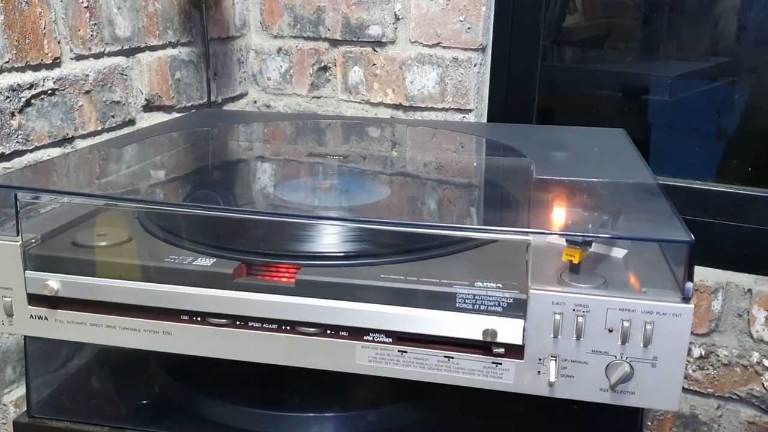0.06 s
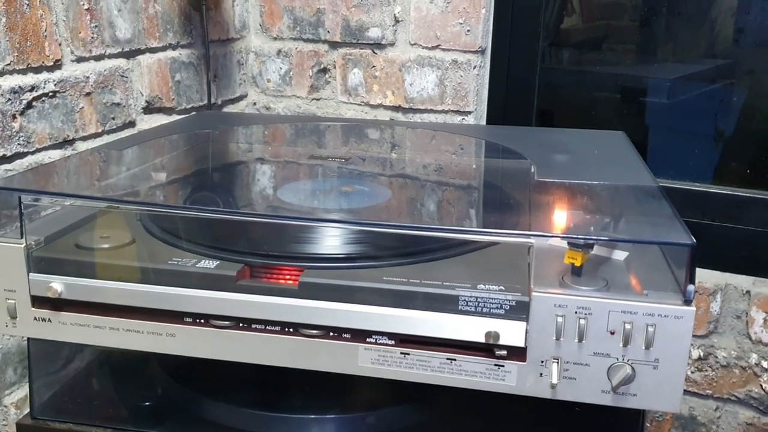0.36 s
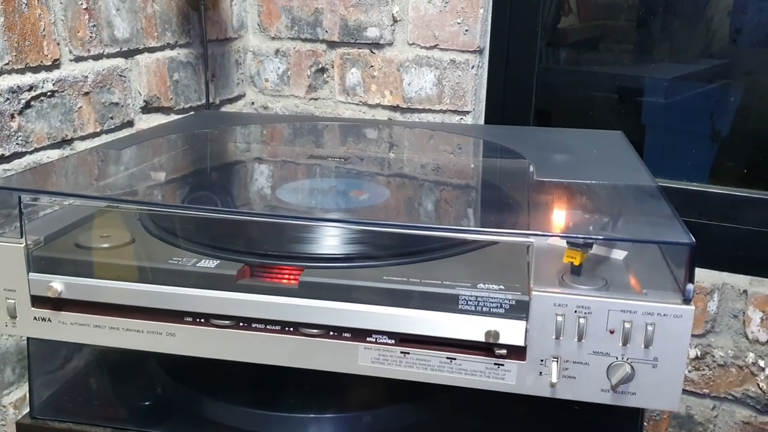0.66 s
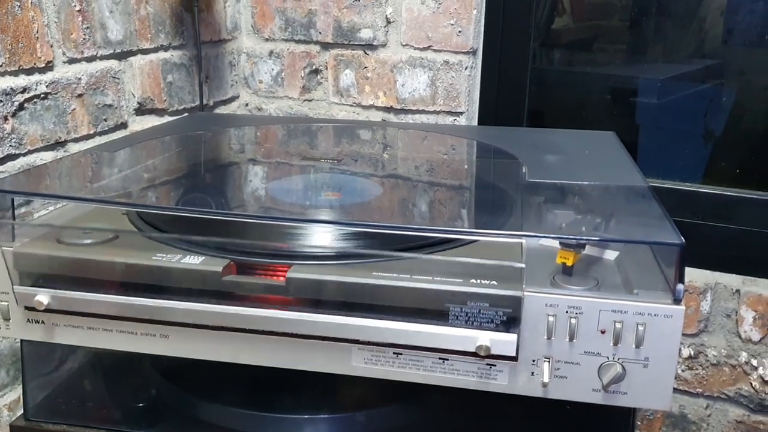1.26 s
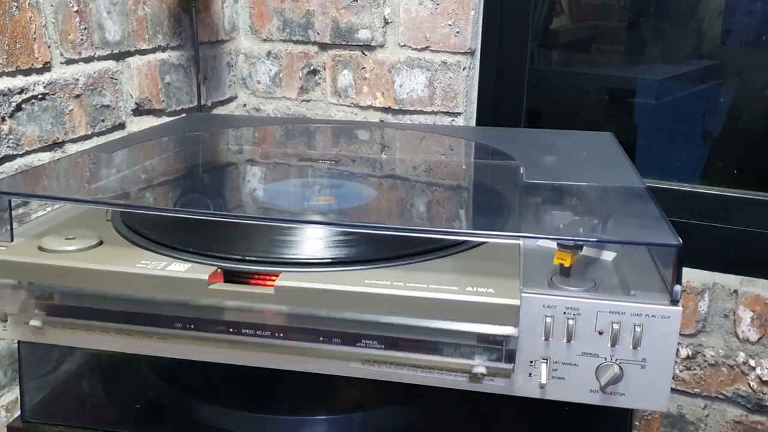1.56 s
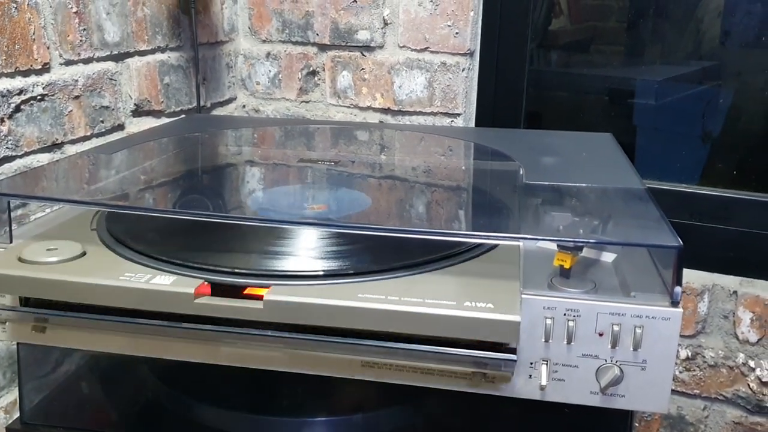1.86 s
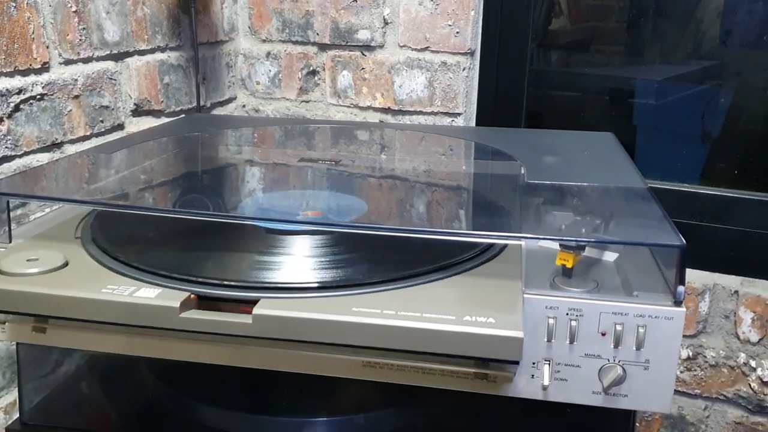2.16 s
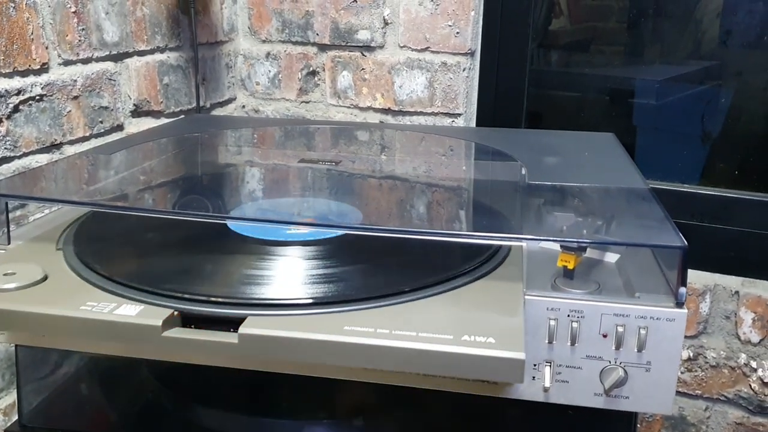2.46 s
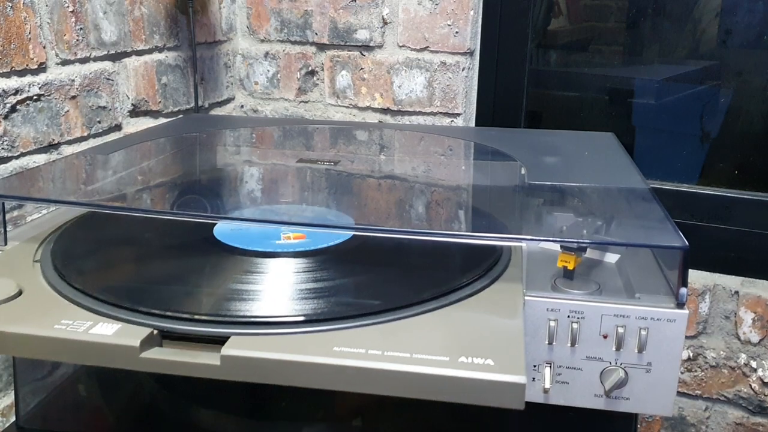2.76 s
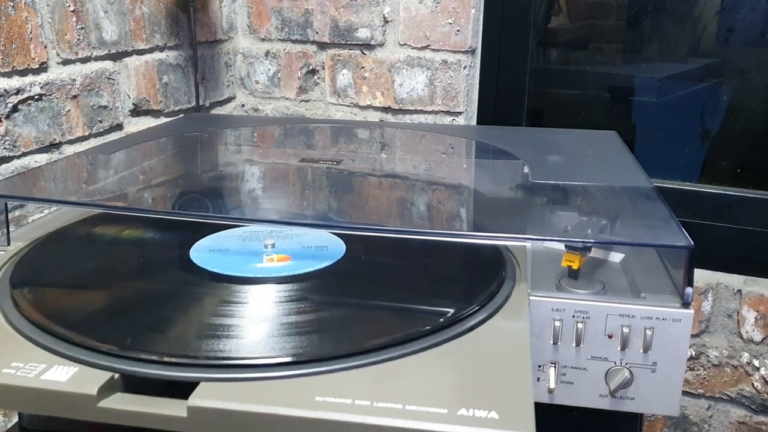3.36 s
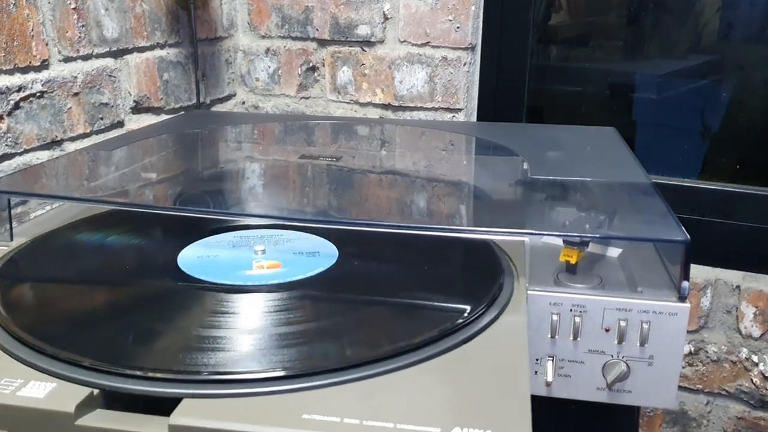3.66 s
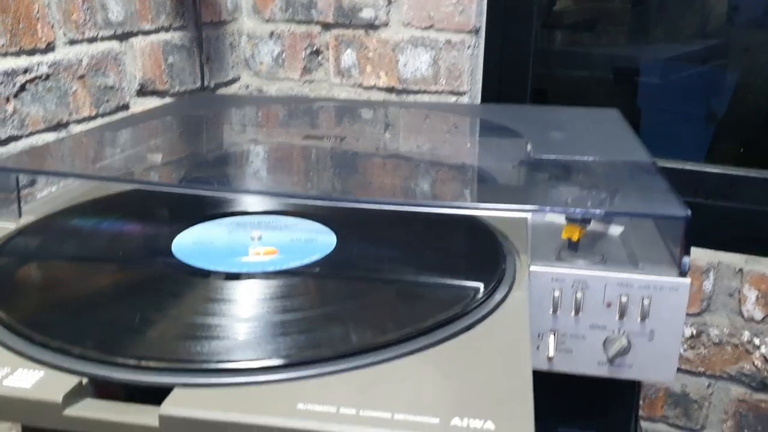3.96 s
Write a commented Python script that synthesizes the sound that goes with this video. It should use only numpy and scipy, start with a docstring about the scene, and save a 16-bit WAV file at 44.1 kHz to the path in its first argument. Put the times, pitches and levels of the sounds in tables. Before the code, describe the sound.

A record player drawer clunks free, then glides open with a small motor's whir.

```python
"""A motor-driven turntable drawer

The latch lets go with a rattling clunk, its impacts exciting the modes of the case. A small geared
motor whirs at multiples of its turn rate while friction makes the runners rub and sing and the heavy
drawer shudder. A close stereo microphone, duller on the right, hears it over faint rumble and hiss."""
import sys
import numpy as np
from scipy import signal
from scipy.fft import rfft, irfft
from scipy.io import wavfile
from scipy.ndimage import uniform_filter1d

SR = 44100
rng = np.random.default_rng(int(sys.argv[2]) if len(sys.argv) > 2 else 0)


def dump_mix(stems):
    """Bounce the given channels to the path in sys.argv[1] as a 16-bit WAV at rate SR."""
    frames = np.atleast_2d(stems).T  # one column per channel
    limited = np.clip(frames, -1, 1)  # hard clip at full scale
    pcm = np.round(limited * 32767).astype(np.int16)
    wavfile.write(sys.argv[1], SR, pcm)


N = 176400

# Speed of the drive gear. Each row: time in seconds, turns per second.
GEAR_SPEED = [(1.0, 38.6), (1.3, 38.2), (1.5, 38.9), (1.7, 40.3), (2.15, 41.0), (2.5, 41.7), (2.75, 42.9),
              (3.1, 43.8), (3.45, 43.0), (3.75, 41.3), (4.0, 41.0)]
# Gear tones. Each entry: a multiple of the turn rate; in the second table, its level in dB.
GEAR_HARMONICS = [7, 8, 10, 15, 23, 27]
GEAR_LEVELS = [-70, -66, -68.5, -76, -73.5, -77.5]
# Hum of a panel at top speed. In order: start and end in seconds, multiple of the turn rate.
PANEL_HUM = (2.66, 3.48, 6)
# Swells of the case as the motor labours. Each row: middle in seconds, level in dB.
CASE_SWELLS = [(1.12, -61), (1.27, -55.5), (2.02, -57.5), (2.76, -53.5), (2.99, -57), (3.15, -55),
               (3.29, -58), (3.45, -54.5), (3.63, -53.5), (3.75, -58)]
# Singing runners. Each row: middle and half length in seconds, pitch and width in Hz, level in dB.
RUNNER_NOTES = [(1.27, .09, 2186, 14, -61.5), (1.29, .06, 2126, 14, -64), (1.19, .15, 2280, 450, -64.5),
                (1.48, .14, 2010, 240, -66), (2.6, .6, 1915, 22, -74), (2.77, .04, 2135, 120, -64.5),
                (3.77, .16, 2250, 700, -68), (3.89, .06, 2020, 150, -63.5)]
# Rubbing of runners and gears. Each row: time in seconds, levels of body, scrape and hiss in dB.
RUB_LEVELS = [(1.07, -49, -57.5, -65), (1.18, -51, -55.5, -64.5), (1.5, -51.5, -58, -64.5),
              (1.62, -48, -56, -63), (1.68, -57, -59.5, -67), (1.75, -50.5, -59, -65),
              (1.97, -57, -60, -64.5), (1.99, -46, -53.5, -63), (2.11, -55.5, -60.5, -69.5),
              (2.19, -54, -59.5, -64), (2.55, -55.5, -61.5, -67), (2.74, -54, -58, -62.5),
              (3.05, -55, -59.5, -65.5), (3.48, -57, -59, -70), (3.62, -50, -56.5, -66.5),
              (3.92, -57, -56.5, -62.5), (3.97, -56, -61.5, -66), (4.0, -58, -54.5, -66.5)]
# Light rubs of the runners. Each row: middle in seconds, level in dB, half length in seconds.
RUNNER_BRUSHES = [(1.21, -70, .05), (1.568, -66, 0.065), (2.89, -63, 0.035)]
# Rocking modes of the drawer. Each row: frequency and width of its wander in Hz, relative level in dB.
DRAWER_MODES = [(58.47, 5, 1), (66.1, 18, -4.5)]

# Envelopes of the sliding and rattling parts. Each row: time in seconds, level in dB.
SHUDDER_LEVELS = [(1.05, -53), (1.08, -33), (1.16, -29.5), (1.27, -33.5), (1.37, -27), (1.435, -34.5),
                  (1.49, -27.5), (1.625, -26), (1.675, -41), (1.72, -27.5), (1.745, -34), (1.795, -23.5),
                  (1.875, -40), (1.93, -28), (1.99, -47), (2.04, -33.5), (2.1, -46.5), (2.17, -34),
                  (2.245, -34), (2.28, -42), (2.365, -49), (2.4, -29), (2.45, -57), (2.52, -31.5),
                  (2.55, -43), (2.6, -27.5), (2.78, -28), (2.89, -37), (3.28, -36.5), (3.35, -75),
                  (3.41, -33.5), (3.47, -48), (3.63, -26), (3.74, -37.5), (3.83, -29), (3.9, -31.5),
                  (3.94, -49), (4.0, -38.5)]  # ahead of the shudder's filter
DRAG_LEVELS = [(3.45, -72), (3.56, -54), (3.65, -52.5), (3.76, -58.5), (3.9, -56), (4.0, -61)]
LATCH_LEVELS = [(.845, -85), (.872, -56), (.886, -48), (.91, -49.5), (.925, -49.5), (.96, -41.5),
                (1.0, -41), (1.025, -40), (1.055, -57), (1.1, -78), (1.2, -101)]
CATCH_LEVELS = [(.89, -78), (.93, -56.5), (.965, -58), (.98, -53), (1.005, -52), (1.03, -61), (1.08, -74.5)]

# Knocks on the case. Each row: start in seconds, ring, clatter and tick in dB, contact time in seconds.
CASE_KNOCKS = [(0.257, -61.5, -52.5, -76, 0.0055), (.292, -59, -51, -77, 0.0096),
               (.326, -62, -59, -78, 0.01), (.882, -49, -47, -80, 0.0013), (.899, -47, -48, -80, 0.0019),
               (.948, -49, -44, -73, 0.0016), (.977, -54, -47, -47, 0.0015),
               (0.999, -46.5, -50, -48, 0.0008), (1.024, -36, -57, -76, 0.0022),
               (1.561, -58, -51, -74, 0.006), (1.991, -55, -50.5, -69, 0.0023)]
# Modes of the struck case. Each row: frequency in Hz, 60 dB decay time in seconds, relative level in dB.
KNOCK_MODES = [(208, 0.11, -9), (301.5, 0.22, -2.5), (420, 0.16, 2), (508, 0.15, -16), (746, 0.11, -13),
               (1198, 0.14, -17), (1405, 0.07, -20), (2194, 0.068, -19)]
# Bright ringing edges of clicks and knocks, and small latch squeaks.
# Each row: start in seconds, level in dB, pitch and width in Hz, 60 dB decay time in seconds.
RINGING_BANDS = [(.275, -68, 3300, 3000, 0.52), (.853, -61, 5900, 1500, 0.12),
                 (0.858, -61, 1380, 900, 0.21), (1.555, -60, 1300, 450, .25), (1.994, -56, 1220, 350, 0.26)]
# Dull bumps of the drawer. Each row: start in seconds, level in dB, frequency in Hz.
DRAWER_BUMPS = [(0.281, -43.5, 66.7), (0.561, -43.5, 64), (0.924, -37.5, 71), (2.177, -34, 92),
                (2.198, -37, 131), (2.2, -46.5, 201), (2.318, -32.5, 94)]

# Spectral shapes of the sources. Each row: frequency in Hz, relative level in dB.
BODY_SPECTRUM = [(40, -9.5), (100, 7.5), (140, 0), (180, 3), (230, -2.5), (300, -1), (360, -4), (400, 1.5),
                 (428, -2), (480, -6.5), (560, 0), (650, -24.5), (900, -20), (3000, -83)]
SCRAPE_SPECTRUM = [(300, -24), (600, -5.5), (740, 3), (850, -6.5), (960, 1.5), (1060, -4), (1190, 4.5),
                   (1300, -4.5), (1700, -4.5), (1950, -0.5), (2250, -5), (2800, -8.5), (6500, -15),
                   (7500, -25), (11000, -18.5), (14000, -25), (16000, -7.5)]
HISS_SPECTRUM = [(1500, -29.5), (3000, 1), (6800, 3), (7400, -2.5), (12000, -5.5), (14200, 2.5),
                 (16000, -20)]
SHUDDER_SPECTRUM = [(15, -26.5), (36, -2.5), (52, -3), (86, 5.5), (110, -4.5), (250, -36.5)]
DRAG_SPECTRUM = [(170, -20), (330, 12), (460, 1), (550, 6), (730, -1), (930, 0.5), (1400, -15),
                 (2200, -11.5), (3200, -14), (6000, -26), (8000, -29), (16000, -27)]
BRUSH_SPECTRUM = [(1200, -16), (2300, 9), (3000, -1), (6500, 4), (7500, -6), (12000, 2), (14300, 9),
                  (16000, -3)]
RATTLE_SPECTRUM = [(30, -17), (70, 13), (130, -7), (300, -1.5), (420, -7), (520, -2.5), (750, -10.5),
                   (900, -9), (1200, -5.5), (1600, -15.5), (2200, -13.5), (2700, -27.5), (6000, -24.5),
                   (7500, -33), (15000, -44)]
CATCH_SPECTRUM = [(1500, -26), (3000, 5.5), (4200, 3), (6000, 1.5), (7500, 0), (10500, 0), (11800, 7.5),
                  (13000, 2), (16000, -3.5)]
TICK_SPECTRUM = [(1500, -43), (3000, -10), (5500, 1), (7500, -10), (10800, -11), (11600, 11), (12200, -4),
                 (12800, -11), (16000, -20)]
BACKGROUND_SPECTRUM = [(20, -40), (40, -2.5), (60, 0.5), (80, -1.5), (120, -13), (250, -21), (400, -28.5),
                       (650, -47.5), (1000, -38.5), (1350, -31), (1800, -41), (2300, -38), (3000, -42),
                       (4000, -36.5), (5000, -36), (6800, -32.5), (7500, -40.5), (12000, -39),
                       (14300, -33.5), (16000, -42)]

# Stereo width. Each row: frequency in Hz, level of side against mid in dB.
STEREO_WIDTH = [(60, -19.5), (130, -13.5), (250, -13), (500, -5.5), (1000, 0), (2000, -1), (4000, 0.5),
                (16000, 1.5)]
# Response of the right microphone port. Each row: frequency in Hz, gain against the left in dB.
RIGHT_RESPONSE = [(100, 0), (1000, -1), (2300, 1), (3200, -7.5), (5000, -3.5), (7300, -9.5), (8700, 2),
                  (11300, -4), (12500, -11), (14000, -22), (16000, -46)]

MOTOR_START_S, MOTOR_FADE_S = 1.037, 0.055
FLUTTER, TOOTH_DEPTH = 0.0023, 0.21  # fractions of the gear speed and of the rubbing amplitude
CASE_HZ, CASE_WIDTH_HZ, CASE_SWELL_S = 517.3, 10, .052
CLATTER_T60_S, TICK_T60_S, BUMP_RISE_S = 0.29, 0.066, .011
CONTACT_CYCLES = 8.8  # a contact dulls the clatter above this many cycles per contact time
BACKGROUND_DB, TOP_HZ = -52.5, 15750


def drive():
    """Rotation sets the period: gear tones, panel hum and the pulse of the rubbing share one angle."""
    turn_rate = curve(GEAR_SPEED) * (1 + FLUTTER * drift(24.95))
    angle = 2 * np.pi * np.cumsum(turn_rate) / SR
    whir = gear_whir(angle) + panel_hum(angle) + case_resonance()
    return (whir + runner_singing() + rubbing(angle)) * running()


def gear_whir(angle):
    """Periodic meshing gives harmonics of the turn rate, roughened by fast amplitude modulation."""
    tones = sum(harmonic(angle, order, db, waver_db=2.5)
                for order, db in zip(GEAR_HARMONICS, GEAR_LEVELS))
    return tones * unit(undb(2.5 * drift(120)))


def panel_hum(angle):
    """Forced vibration: a panel follows one harmonic of the gear during the span of top speed."""
    start, end, order = PANEL_HUM
    gate = ramp(np.minimum(clock() - start, end - clock()), length=.04)
    return harmonic(angle, order, db=-56.5, waver_db=0.66) * gate


def case_resonance():
    """One resonance of the case rings in wavering swells as the motor labours."""
    load = sum(undb(db) * swell(middle, CASE_SWELL_S) for middle, db in CASE_SWELLS)
    return sustained_mode(CASE_HZ, CASE_WIDTH_HZ) * load * undb(3 * drift(60))


def runner_singing():
    """Friction excites resonances of the runners, which sing thinly for a while."""
    return sum(undb(db) * resonant_noise(hz, width) * swell(middle, half_length)
               for middle, half_length, hz, width, db in RUNNER_NOTES)


def rubbing(angle):
    """Sliding friction makes broadband noise; its grainy body and scrape pulse three times a turn."""
    pulse = 1 + TOOTH_DEPTH * np.cos(3 * angle)
    grip = unit(pulse * undb(drift(450)))
    body = shaped_noise(BODY_SPECTRUM, grip) * undb(curve(RUB_LEVELS))
    scrape = shaped_noise(SCRAPE_SPECTRUM, grip) * undb(curve(RUB_LEVELS, column=2))
    hiss = shaped_noise(HISS_SPECTRUM) * undb(curve(RUB_LEVELS, column=3) + .5 * drift(8.06))
    return body + scrape + hiss


def drawer_shudder():
    """The sliding drawer rocks in two low modes, in fits and starts; friction evens out their beating."""
    modes = sum(undb(db) * sustained_mode(hz, width) for hz, width, db in DRAWER_MODES)
    beat_envelope = np.abs(signal.hilbert(modes))
    rocking = unit(modes / beat_envelope ** .6)
    sway = undb(-18) * sustained_mode(hz=61, width=11) * np.array([[1], [-1]])  # channels in antiphase
    return colour((rocking + sway) * undb(curve(SHUDDER_LEVELS)) * running(), SHUDDER_SPECTRUM)


def runner_drag():
    """Friction noise: light brushes on the way, and rougher sliding as the drawer hangs further out."""
    sliding = shaped_noise(DRAG_SPECTRUM) * undb(curve(DRAG_LEVELS))
    swells = sum(undb(db) * swell(middle, half_length) for middle, db, half_length in RUNNER_BRUSHES)
    return sliding + shaped_noise(BRUSH_SPECTRUM) * swells


def latch():
    """Irregular contact as the latch lets go: a swelling plastic rattle and the catch's bright scrape."""
    rattle = shaped_noise(RATTLE_SPECTRUM, grain_db=2.5, grain_rate=300)
    catch = shaped_noise(CATCH_SPECTRUM, grain_db=2.7, grain_rate=400)
    return rattle * undb(curve(LATCH_LEVELS)) + catch * undb(curve(CATCH_LEVELS))


def knocks():
    """An impact excites damped case modes, a tick and a clatter; longer contact dulls the clatter."""
    out = 0
    clatter, tick = shaped_noise(RATTLE_SPECTRUM), shaped_noise(TICK_SPECTRUM)
    for start, ring_db, clatter_db, tick_db, contact in CASE_KNOCKS:
        age = clock() - start
        modes = 0
        for hz, t60, mode_db in KNOCK_MODES:
            detuned_hz = hz * (1 + 0.013 * rng.standard_normal())
            modes += undb(mode_db) * decay(start, t60) * np.sin(2 * np.pi * detuned_hz * age)
        pole = np.exp(-2 * np.pi * CONTACT_CYCLES / contact / SR)
        dulled = signal.lfilter([1 - pole], [1, -pole], clatter)
        blow = (undb(ring_db) * modes
                + undb(clatter_db) * dulled * decay(start, CLATTER_T60_S)
                + undb(tick_db) * tick * decay(start, TICK_T60_S))
        out += blow * np.clip(age / contact, 0, 1)
    return out


def bumps():
    """Heavy damping limits each soft thud of the drawer to a few cycles."""
    out = 0
    for start, db, hz in DRAWER_BUMPS:
        age = np.maximum(clock() - start, 0)
        envelope = age / BUMP_RISE_S * np.exp(1 - age / BUMP_RISE_S)
        out += undb(db) * envelope * np.sin(2 * np.pi * hz * age)
    return out


def bright_ringing():
    """Decaying bands of noise: bright ringing edges of clicks and knocks, and small latch squeaks."""
    return sum(undb(db) * resonant_noise(hz, width) * decay(start, t60)
               for start, db, hz, width, t60 in RINGING_BANDS)


def background():
    """Stationary noise: a faint low rumble and hiss."""
    return undb(BACKGROUND_DB) * shaped_noise(BACKGROUND_SPECTRUM)


def harmonic(angle, order, db, waver_db):
    """A tone locked to a multiple of the rotation, wavering in level."""
    amplitude = np.sqrt(2) * undb(db + waver_db * drift(15))
    return amplitude * np.sin(order * angle + rng.uniform(0, 2 * np.pi))


def sustained_mode(hz, width):
    """A resonance sustained by friction: even in strength, wandering in pitch."""
    pitch = hz + width / 2 * drift(2 * width)
    return np.sqrt(2) * np.sin(2 * np.pi * np.cumsum(pitch) / SR)


def resonant_noise(hz, width):
    """Noise through two resonators in series, each of the given width in Hz."""
    b, a = signal.iirpeak(hz, hz / width, fs=SR)
    return unit(signal.lfilter(b, a, signal.lfilter(b, a, stereo_noise())))


def shaped_noise(spectrum, modulation=1, grain_db=0, grain_rate=0):
    """Stereo noise, optionally modulated in amplitude, then filtered; rms 1."""
    noise = stereo_noise() * modulation
    if grain_db:
        noise *= undb(grain_db * drift(grain_rate))
    return unit(colour(noise, spectrum))


def stereo_noise():
    """Partly coherent noise: the channels are alike in the bass, nearly unrelated in the treble."""
    hz, db = np.array(STEREO_WIDTH).T
    side_gain = undb(np.interp(np.arange(N // 2 + 1) * SR / N, hz, db))
    mid, side = rfft(rng.standard_normal((2, N)))
    channels = mid + np.array([[1], [-1]]) * side_gain * side
    return unit(irfft(channels / np.sqrt(1 + side_gain ** 2), N))


def colour(x, points):
    """Minimum-phase filter through (Hz, dB) points."""
    hz, db = np.array(points).T
    bin_hz = np.maximum(np.arange(N + 1) * SR / (2 * N), 1)
    gain = undb(np.interp(np.log(bin_hz), np.log(hz), db))
    cepstrum = irfft(np.log(gain))
    cepstrum[1:N] *= 2  # folding onto positive time makes the filter causal
    cepstrum[N + 1:] = 0
    return irfft(rfft(x, 2 * N) * np.exp(rfft(cepstrum)))[..., :N]


def drift(rate):
    """Smooth random motion of rms 1, through `rate` values a second."""
    steps = rng.standard_normal(2048)
    joined = np.interp(clock() * rate, np.arange(len(steps)), steps)
    return unit(uniform_filter1d(joined, 64))


def running():
    """Gain that rises from 0 to 1 as the motor starts."""
    return ramp(clock() - MOTOR_START_S, MOTOR_FADE_S)


def ramp(age, length):
    """Linear rise from 0 to 1 over `length` seconds, centred on age zero."""
    return np.clip(age / length + .5, 0, 1)


def decay(start, t60):
    """Sudden onset and exponential decay, by 60 dB in t60 seconds."""
    age = clock() - start
    return (age >= 0) * np.exp(-np.log(1000) * np.clip(age / t60, 0, 10))


def swell(middle, half_length):
    """Gaussian envelope with a peak of 1."""
    return np.exp(-((clock() - middle) / half_length) ** 2)


def curve(rows, column=1):
    """One column of a table, interpolated linearly in time."""
    rows = np.array(rows)
    return np.interp(clock(), rows[:, 0], rows[:, column])


def clock():
    """Time of each sample in seconds."""
    return np.arange(N) / SR


def undb(db):
    """Decibels to amplitude ratio."""
    return 10 ** (np.asarray(db) / 20)


def unit(x):
    """Scale to rms 1."""
    return x / np.sqrt(np.mean(x ** 2))


def scene():
    """Superposition of latch, motor and drawer over the background."""
    clunks = latch() + knocks() + bright_ringing() + bumps()
    return clunks + drive() + runner_drag() + drawer_shudder() + background()


def record(dry):
    """Microphone response: the right port is duller, and a steep low-pass cuts the top of both sides."""
    heard = np.array([dry[0], colour(dry[1], RIGHT_RESPONSE)])
    low_pass = signal.ellip(12, .1, 80, TOP_HZ, fs=SR, output="sos")
    return signal.sosfilt(low_pass, heard)


dry = scene()
out = record(dry)
dump_mix(out)
```